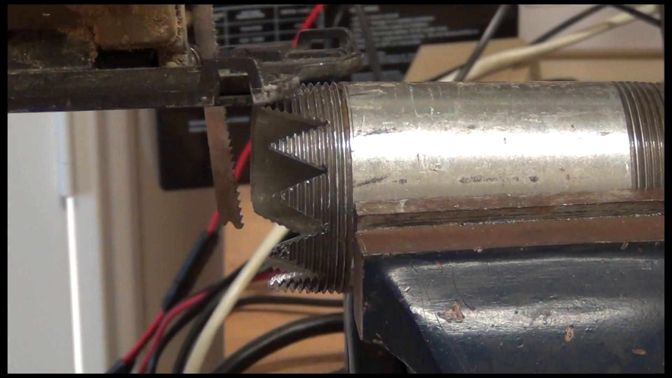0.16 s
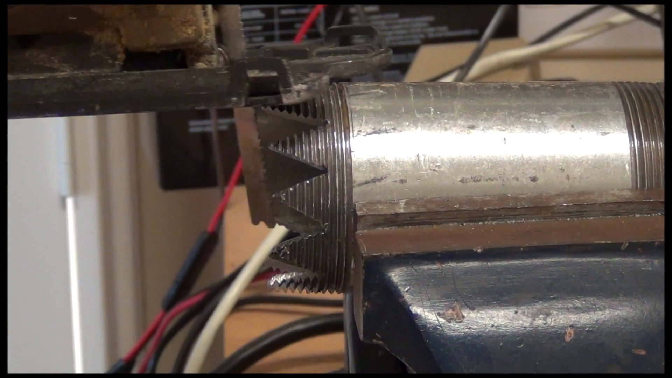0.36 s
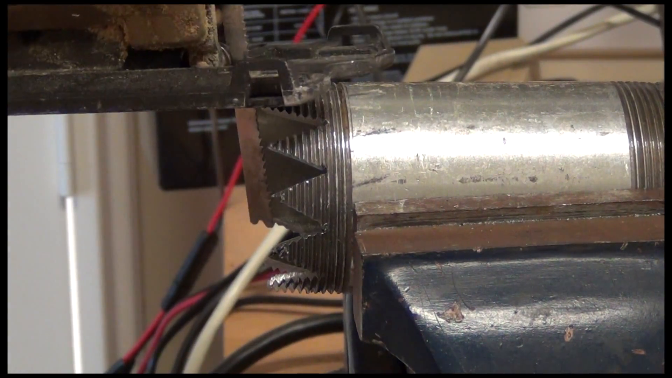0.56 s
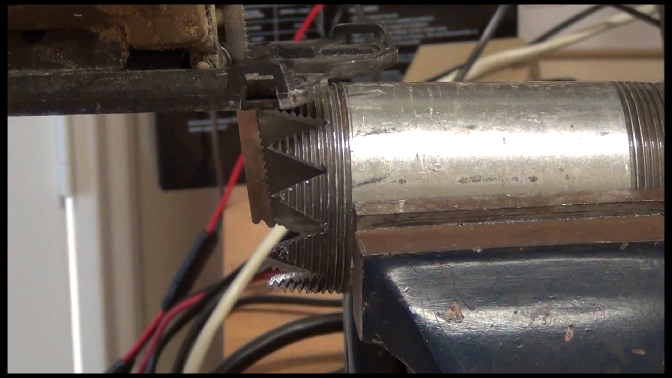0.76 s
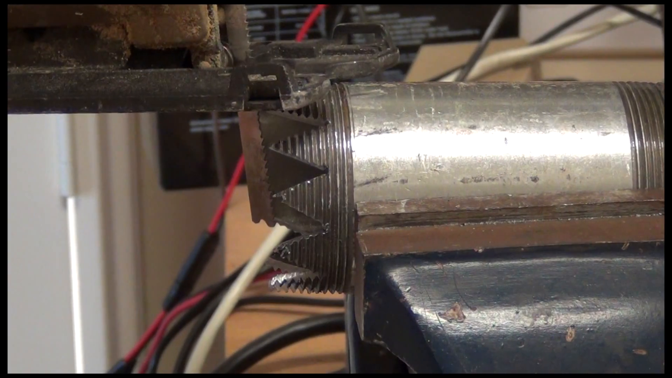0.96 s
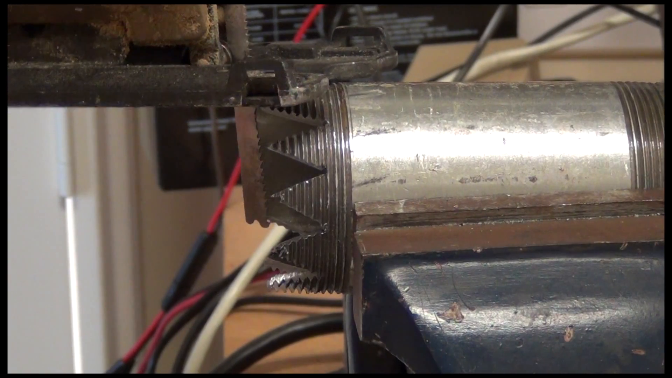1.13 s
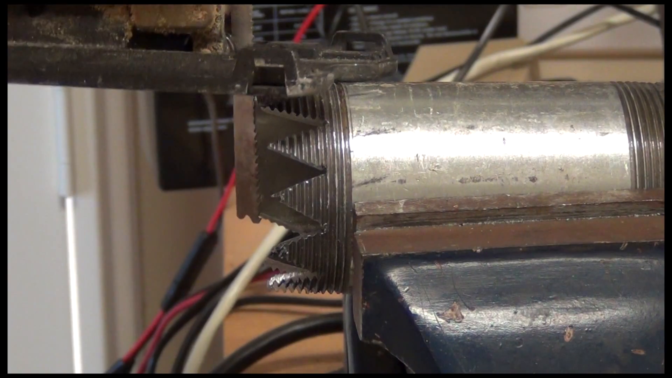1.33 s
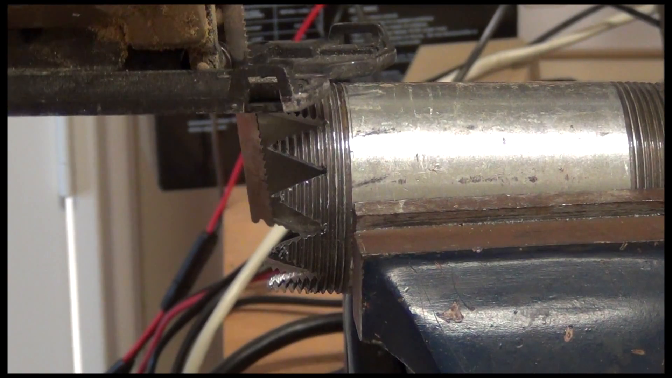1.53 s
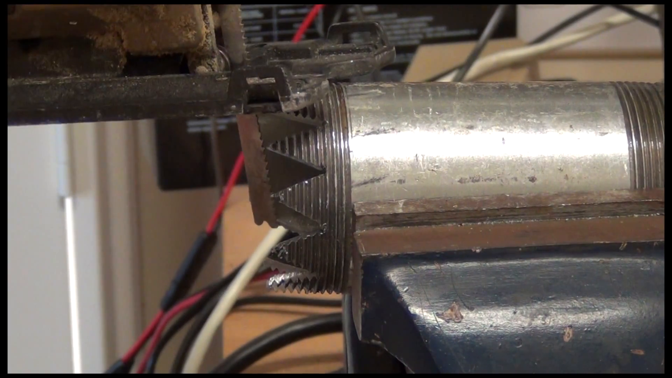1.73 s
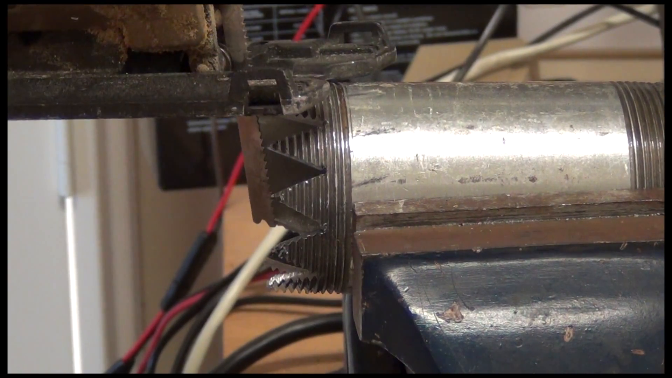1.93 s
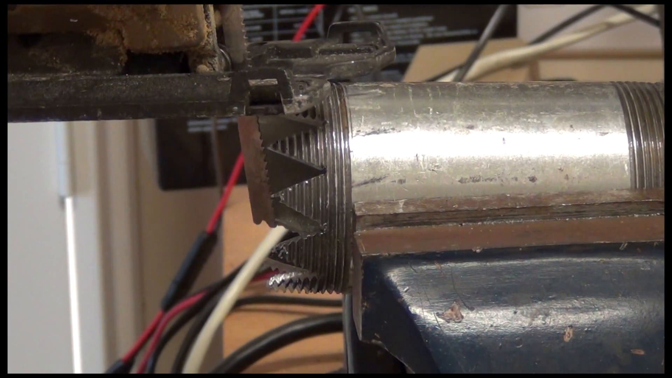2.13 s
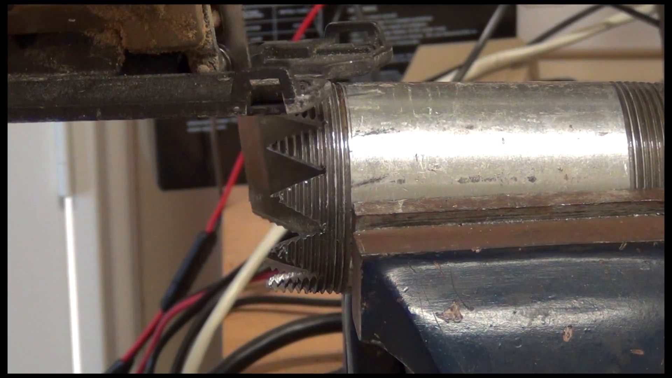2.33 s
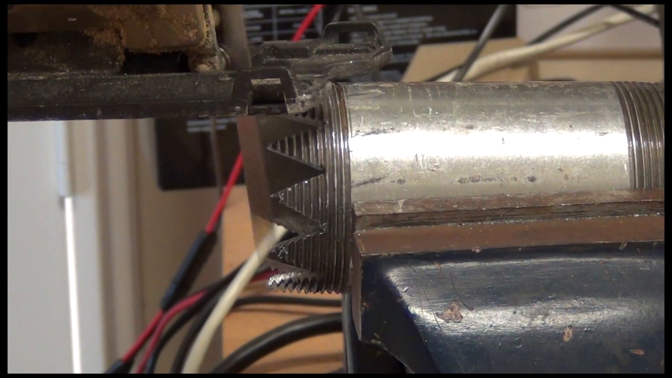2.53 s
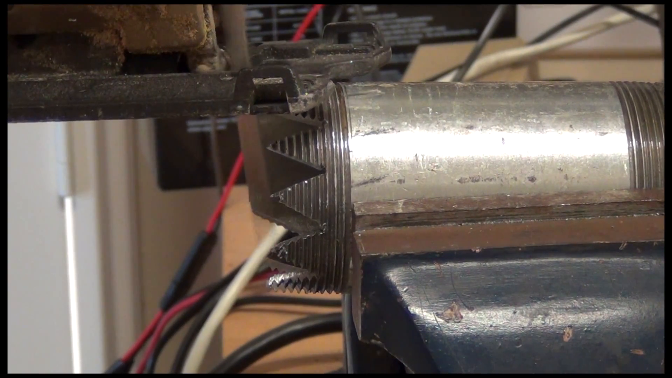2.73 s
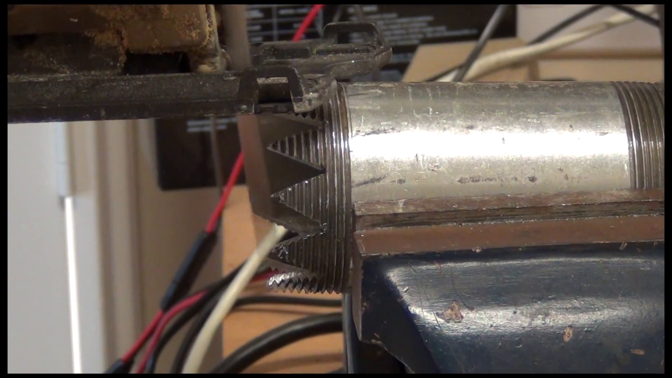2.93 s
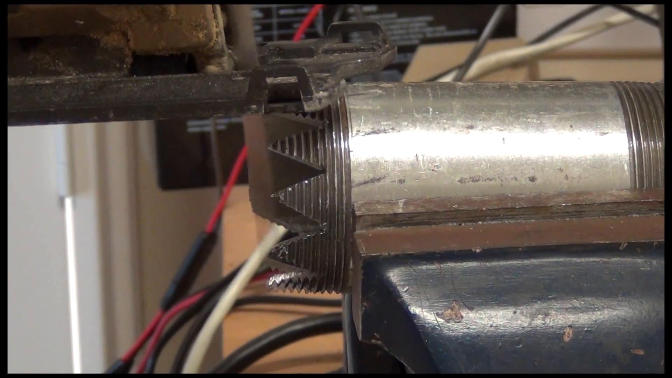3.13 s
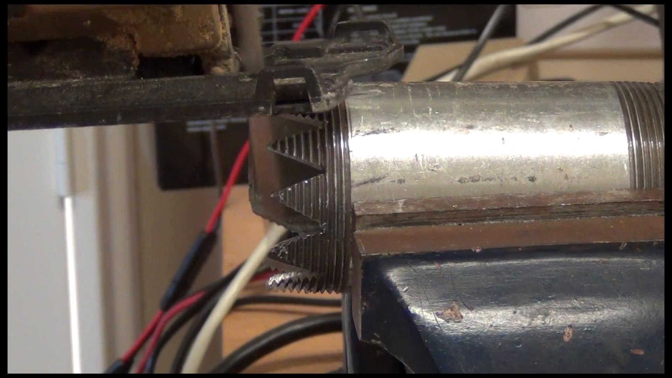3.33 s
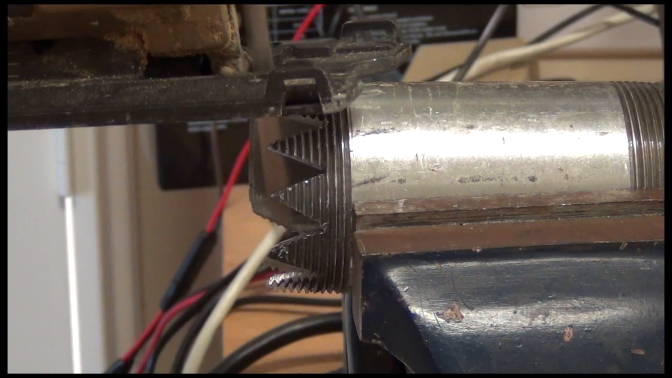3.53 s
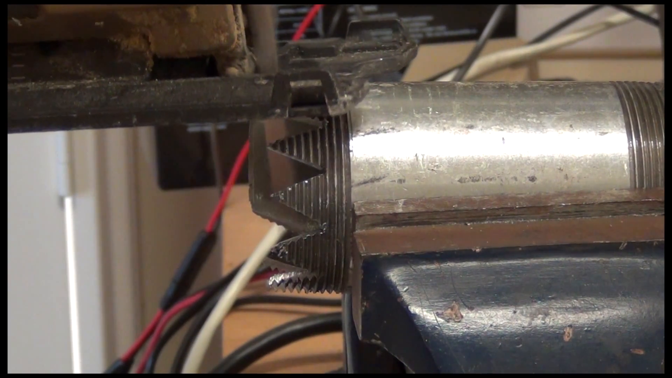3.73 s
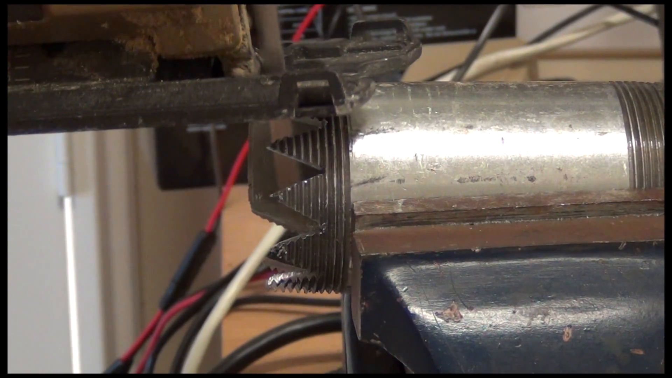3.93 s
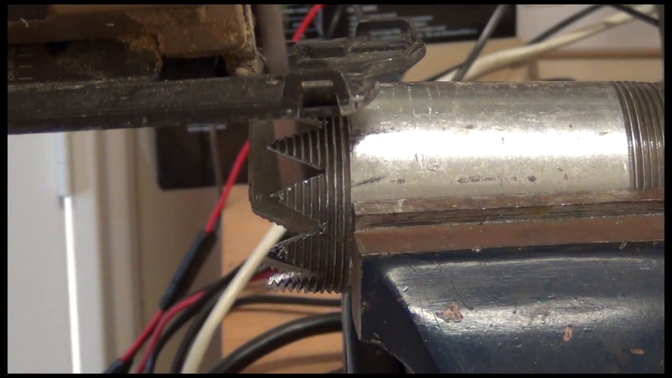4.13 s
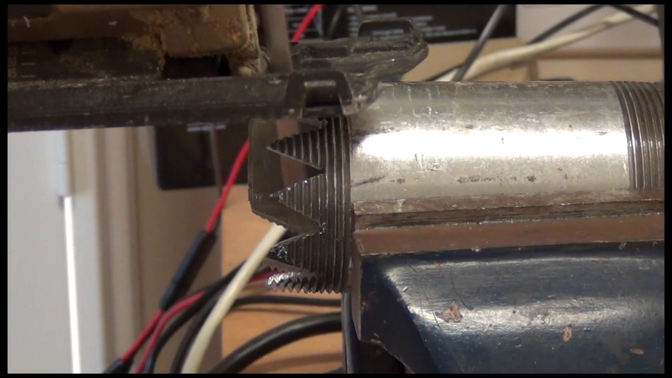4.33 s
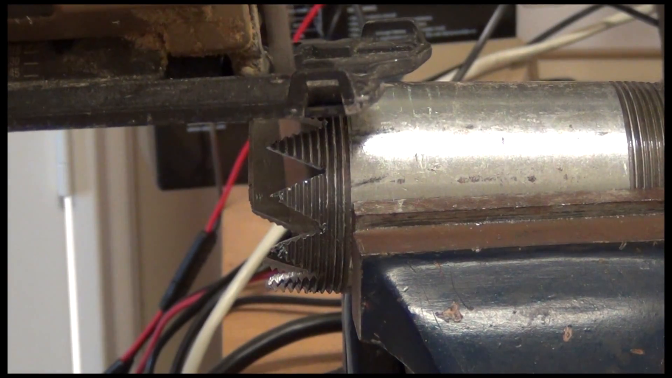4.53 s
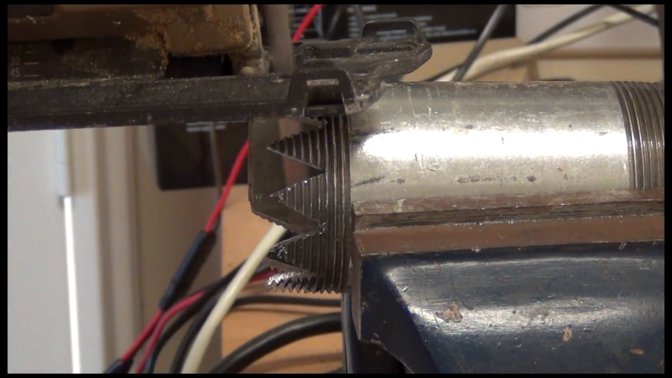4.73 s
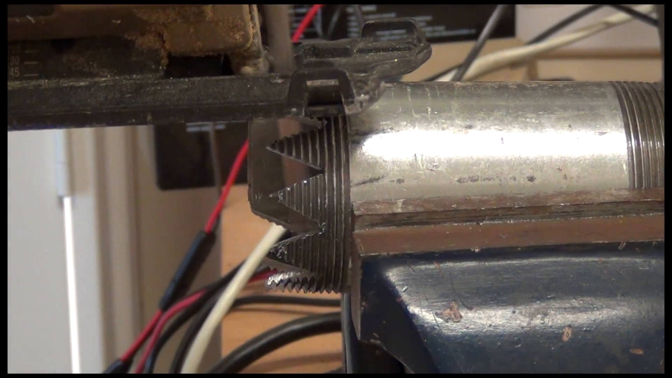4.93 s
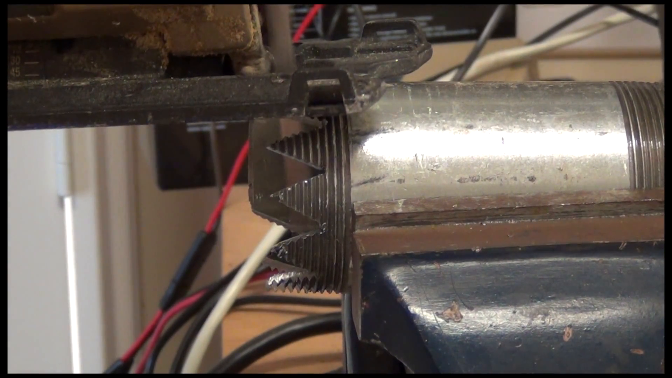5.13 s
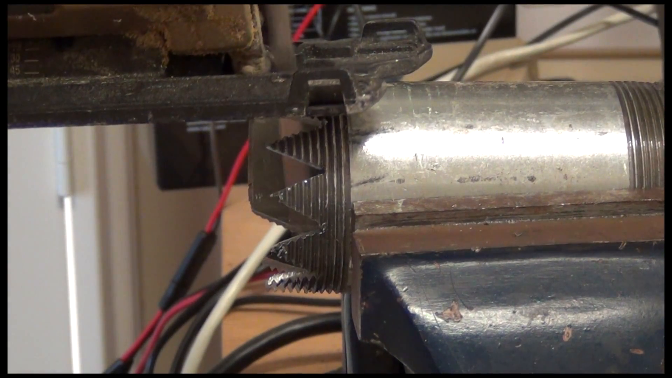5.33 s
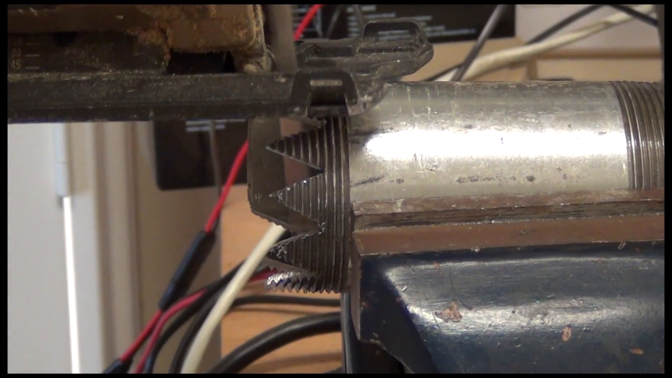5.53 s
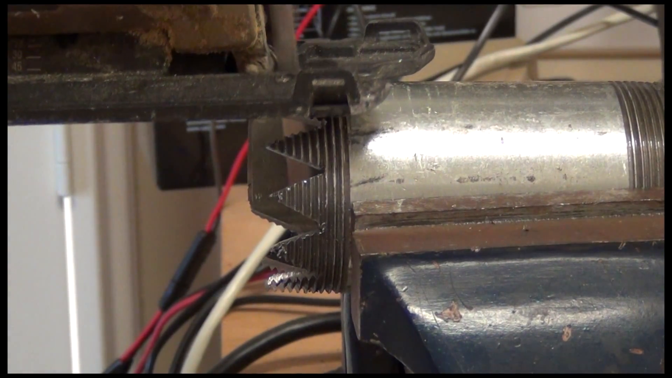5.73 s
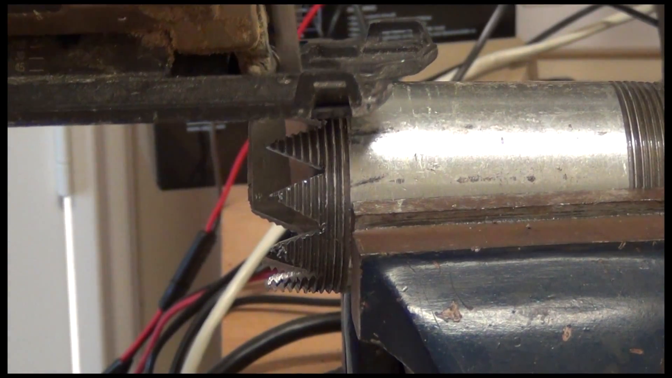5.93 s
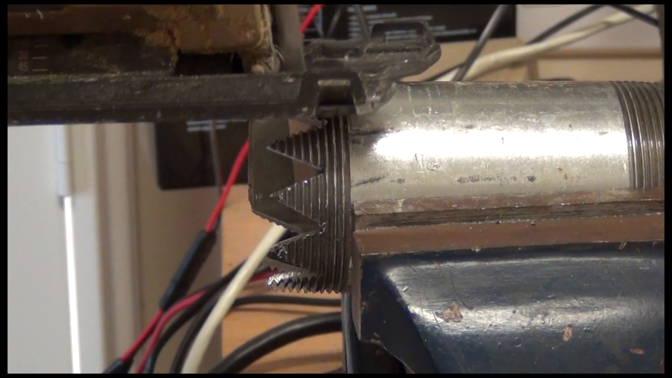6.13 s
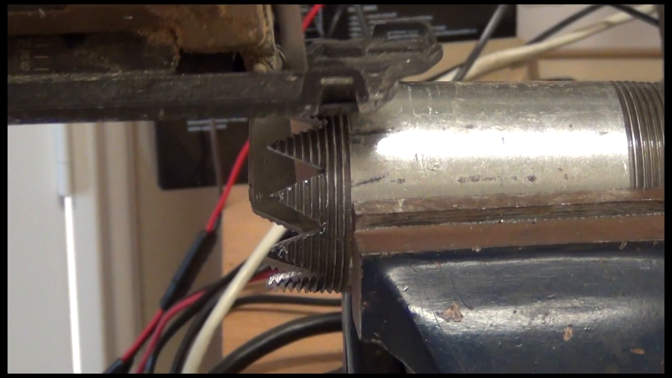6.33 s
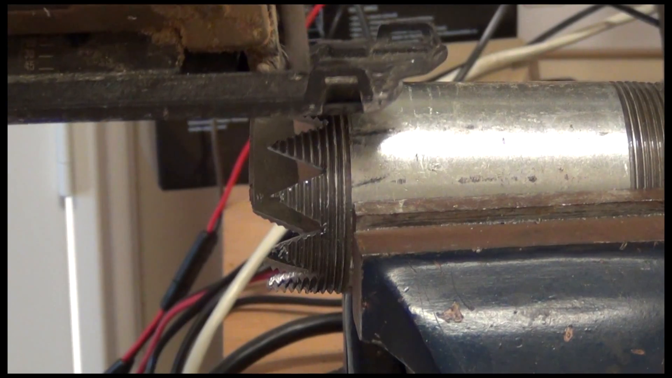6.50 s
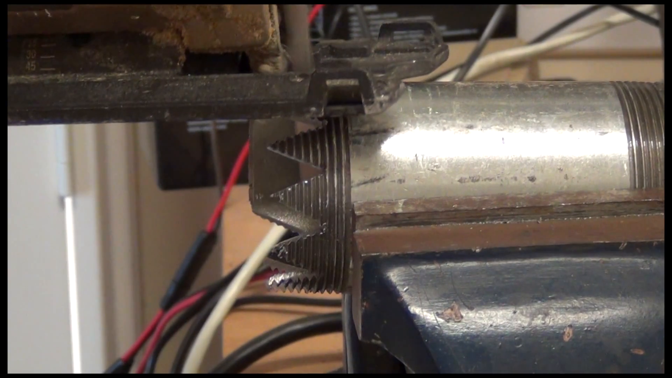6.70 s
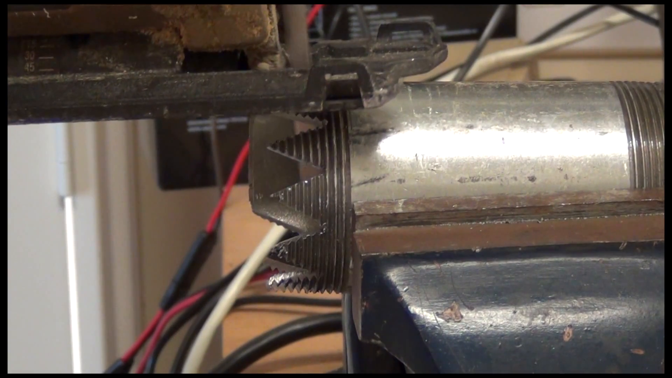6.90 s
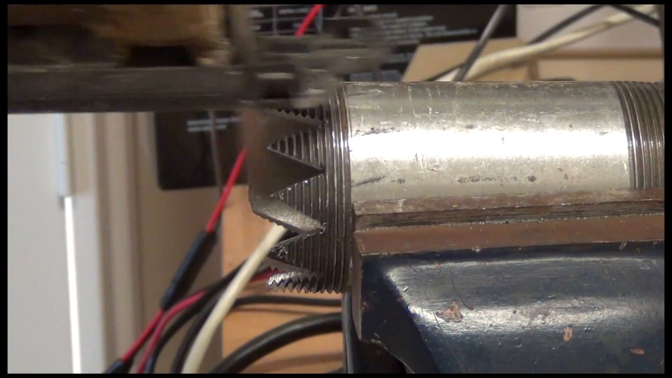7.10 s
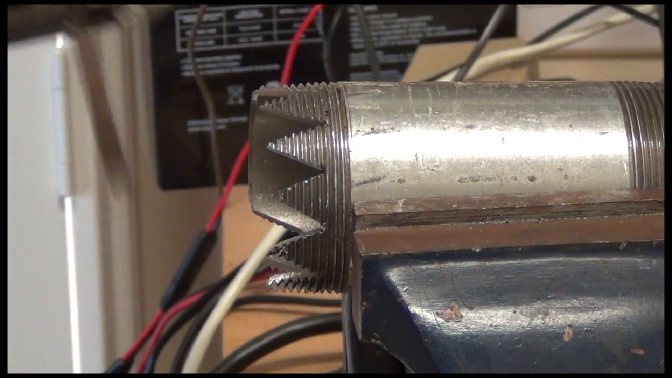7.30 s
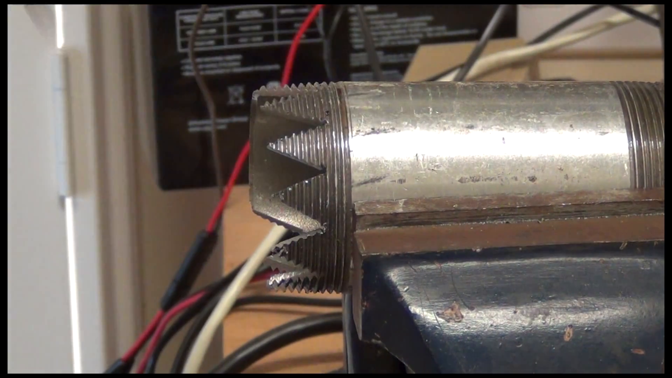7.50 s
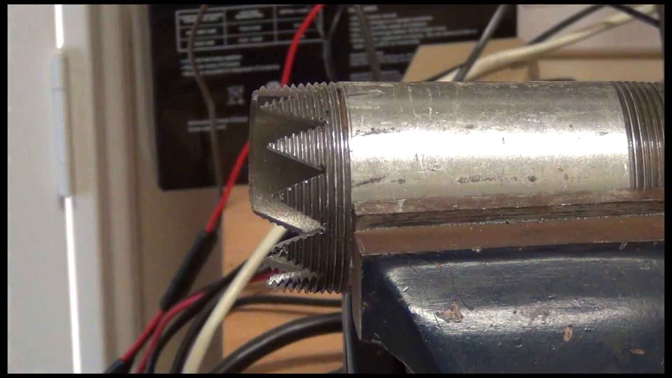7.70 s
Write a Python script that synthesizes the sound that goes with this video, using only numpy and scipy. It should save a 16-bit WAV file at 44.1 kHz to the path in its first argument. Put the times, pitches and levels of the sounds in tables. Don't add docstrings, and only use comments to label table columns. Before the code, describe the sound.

Over a steady room hum, metal ticks and light scrapes, then an electric jigsaw bites loudly into a clamped metal pipe and finally winds down.

```python
import sys
import numpy as np
from scipy import signal
from scipy.fft import rfft, irfft, next_fast_len
from scipy.io import wavfile
from scipy.ndimage import uniform_filter1d, map_coordinates

SR = 44100
rng = np.random.default_rng(int(sys.argv[2]) if len(sys.argv) > 2 else 0)


def materialize(psi):
    bounded = np.clip(np.atleast_2d(psi).T, -1, 1)
    quanta = np.round(bounded * 32767).astype(np.int16)
    wavfile.write(sys.argv[1], SR, quanta)


def how_loud(loudness_db):
    steps = np.asarray(loudness_db, float) / 20
    return 10 ** steps


N = 346613
T = np.arange(N) / SR
LEFT_RIGHT = np.array([[.5], [-.5]])


def evened(x):
    return x / np.sqrt(np.mean(x ** 2) + 1e-20)


def read(points, hz):
    f, value = np.transpose(points)
    return np.interp(np.log(hz + 1), np.log(f + 1), value)


def curve(points):
    return np.interp(T, *np.transpose(points))


def bump(t, s, length_s):
    return np.exp(-(2 * (t - s) / length_s) ** 2)


def fade(s, length_s):
    return np.clip((T - s) / length_s + .5, 0, 1)


def drift(hz, size=N, step=64):
    coarse = T[:size:step]
    chance = map_coordinates(rng.standard_normal(400), [coarse * hz % 399], order=3)
    return np.interp(T[:size], coarse, chance)


def tone(hz, phase):
    return np.sqrt(2) * np.cos(2 * np.pi * np.cumsum(hz) / SR + phase)


def coloured(x, gain):
    size = next_fast_len(N)
    return irfft(rfft(x, size) * gain(np.fft.rfftfreq(size, 1 / SR)), size)[..., :N]


def bandpass(x, order, lo_hz, hi_hz):
    sos = signal.butter(N=order, Wn=[lo_hz, hi_hz], btype="band", fs=SR, output="sos")
    return signal.sosfilt(sos, x)


def band(x, lo_hz, hi_hz):
    return evened(bandpass(x, 3, lo_hz, hi_hz))


def resonate(x, hz, width_hz):
    r = np.exp(-np.pi * width_hz / SR)
    if np.ndim(hz) == 0:
        c = r * np.cos(2 * np.pi * hz / SR)
        return evened(signal.lfilter([1, -c], [1, -2 * c, r ** 2], x))
    turn = np.exp(2j * np.pi * np.cumsum(hz) / SR)
    return evened((turn * signal.lfilter([1 - r], [1, -r], x * turn.conj())).real)


# frequency in Hz, level in dB per Hz.
HUM = [(18, -58), (30, -13), (58, -17), (109, -13), (229, -7), (276, -2), (332, 1), (533, -1.5), (953, -3),
       (1890, -7), (6720, -30), (15200, -34.5), (16500, -48)]
# frequency in Hz, level in dB.
HUM_LINES = [(118.4, -59.5), (177.6, -65), (226.1, -54.5), (355.3, -52.5), (479.1, -54.5), (532.9, -50),
             (990.5, -80)]


def workshop():
    air = rng.standard_normal((3, N))
    hum = evened(coloured(air[0] + 0.45 * air[1:], lambda hz: how_loud(read(HUM, hz))))
    hum *= how_loud(-39.5 + .5 * drift(12))
    hum += sum(how_loud(db) * resonate(air[0], hz, 6.0) for hz, db in HUM_LINES)
    gain_db = np.interp(T, [2.25, 2.7], [0, -27])
    return hum * how_loud(gain_db - .7 * LEFT_RIGHT)


# time in seconds, peak in dB, frequency in Hz, low knock in relative dB, pipe ring in relative dB.
TICKS = [(0.0607, -22.5, 4700, 0, -42), (0.0605, -29, 10500, -30, -45), (0.068, -34, 11300, -30, -45),
         (0.1815, -6, 9550, -13, -25.5), (0.1855, -9.5, 10200, -20, -40), (0.183, -12, 3000, -30, -45),
         (0.249, -25, 4520, -12, -21), (0.4738, -33, 4700, -15, -30), (1.1975, -37, 12000, -20, -40),
         (1.1975, -17, 2800, -30, -45), (1.219, -31, 7380, -15, -32), (1.2195, -38, 5900, -30, -45),
         (1.29, -12, 12800, -12, -37), (1.2905, -27, 9000, -30, -45), (1.291, -26, 7100, -30, -45),
         (1.4142, -28, 10300, -15, -30), (1.4686, -27, 8900, -15, -36), (1.5389, -36, 7040, -15, -36),
         (1.598, -13, 11000, -8, -40), (1.5982, -21, 5300, -30, -45), (1.606, -29, 8500, -30, -40),
         (1.617, -31, 10000, -30, -40), (1.676, -25, 10000, -15, -38), (1.692, -32, 9500, -15, -40),
         (2.0931, -35, 11500, -20, -40), (2.1908, -24, 4700, -20, -40), (2.2435, -19, 9000, -6, -35),
         (2.247, -19, 10000, -6, -32), (2.2475, -17, 3000, -10, -40), (2.2652, -5, 11400, 6, -26),
         (2.274, -8, 11900, 5, -33), (2.278, -7, 4000, 3, -24), (2.2836, -5, 10000, 4, -26),
         (2.2918, -5, 10500, -4, -30), (2.2995, -4, 10440, -6, -34), (2.33, -10, 11000, -3, -30),
         (2.3395, -5, 11500, 5, -30), (2.5436, -5, 11000, -3, -35)]
# frequency in Hz, level in dB, t60 in seconds.
TICK_MODES = [(2960, 5, 0.035), (1203, -9, 0.04), (1920, -9, 0.05), (5060, -13, 0.03), (6730, -14, 0.27),
              (7400, -12, 0.14), (7750, -17, 0.43), (8500, -17, 0.17), (8970, -11, 0.22),
              (11520, -8, 0.033)]


def tick(t, hz, low_db, ring_db):
    crack = rng.standard_normal(len(t)) * (how_loud(-60 * t / 0.022) + how_loud(-60 * t / 0.003))
    bright = bandpass(crack, 2, 0.73 * hz, min(1.11 * hz, 14000))
    knock = uniform_filter1d(crack, size=3) - uniform_filter1d(crack, size=120)
    ring = np.zeros(len(t))
    if ring_db > -37:
        for mode_hz, mode_db, t60_s in TICK_MODES:
            level = how_loud(mode_db + ring_db + rng.uniform(4, 9) - 60 * t / t60_s)
            phase = 2 * np.pi * mode_hz * rng.uniform(0.98, 1.03) * t
            ring += level * np.sin(phase + 2.2 * drift(160, size=len(t)))
    rattle = uniform_filter1d(rng.standard_normal(len(t)), size=3)
    ring += 0.17 * how_loud(-8.5 - 60 * t / 0.25) * rattle
    if abs(hz - 7200) < 300:
        ring += how_loud(-18 - 60 * t / .08) * np.sin(2 * np.pi * hz * t)
    return 0.42 * bright + 0.33 * how_loud(low_db) * knock + ring


# time in seconds, peak in dB, frequency in Hz, t60 in seconds.
THUMPS = [
    (0.197, -41, 101, 0.4),
    (1.211, -33, 107, 0.16),
    (2.294, -33, 121, 0.39),
    (2.399, -29, 106, 0.064),
    (6.631, -35, 129, 0.087),
]
# middle in seconds, length in seconds, level in dB.
SCRAPE = [
    (0.001, 0.085, -43.5),
    (0.161, 0.0098, -55),
    (0.26, 0.18, -51),
    (.41, .1, -55),
    (0.74, .07, -51),
    (1.642, .12, -56),
    (2.226, 0.18, -51.5),
]


def handling():
    out, t = np.zeros(N + SR), T[:SR // 3]
    for s, db, hz, low_db, ring_db in TICKS:
        out[round(s * SR):][:len(t)] += how_loud(db) * tick(t, hz, low_db, ring_db)
    for s, db, hz, t60_s in THUMPS:
        out[round(s * SR):][:len(t)] += how_loud(db - 60 * t / t60_s) * np.sin(2 * np.pi * hz * t)
    slide = sum(how_loud(db) * bump(T, s, length_s) for s, length_s, db in SCRAPE)
    return out[:N] + slide * band(rng.standard_normal(N), 3800, 13000)


def walls(x):
    t = T[:SR // 2]
    taps = rng.choice([-1., 1.], (2, len(t))) * (rng.random((2, len(t))) < .05)
    taps *= how_loud(-60 * t / 0.26) * (t > .004)
    wet = signal.fftconvolve(x[None], taps / np.linalg.norm(taps[0]), axes=1)[:, :N]
    return coloured(wet, lambda hz: hz / np.hypot(hz, 250.0))


# time in seconds, strokes per second.
SPEED = [(2.25, 24), (2.78, 26.5), (2.87, 31.8), (2.93, 35.9), (3.02, 40), (3.1, 41.91), (3.3, 43.4),
         (3.57, 42.5), (4.0, 42.0), (4.25, 42.6), (4.59, 43.3), (5.1, 46.1), (5.44, 47.0), (5.78, 46.29),
         (6.12, 45.2), (6.29, 45.55), (6.63, 45.01), (6.83, 45.89)]


def speed():
    off_s = np.maximum(T - SPEED[-1][0], 0)
    return curve(SPEED) - 23 * off_s - 3.6 * (1 - np.exp(-off_s / .185))


# time in seconds, share 0-1.
LOADED = [(2.3, .4), (3.0, 1), (6.9, 1), (7.2, .15)]


def teeth(turns):
    hits = how_loud(2.0 * rng.exponential(1, N)) * rng.standard_normal(N)
    catch = 1 + curve(LOADED) * (.15 * np.cos(2 * np.pi * turns) + .11 * np.cos(6 * np.pi * turns))
    uneven_db = 0.7 * drift(30.0) + (.9 - .5 * fade(3, .4)) * drift(110)
    return evened(hits * catch * how_loud(uneven_db))


# frequency in Hz, width in Hz, level in dB.
PIPE = [(575, 82, 5.5), (847, 77, -1.5), (1108, 65, 1.5), (1223, 99, 7.5), (1644, 81, 7.5), (1820, 35, 3),
        (2320, 46, -12), (2626, 26, 3), (2680, 30, -16.5), (2840, 170, 4), (4750, 90, -26.5),
        (7380, 54, 4.5)]


def pipe_wall(drive):
    rub = rng.standard_normal(N) * abs(drive)
    modes = sum(how_loud(db + 3 * drift(3)) * resonate(rub, hz, width_hz) for hz, width_hz, db in PIPE)
    return drive + how_loud(-27) * modes


# frequency in Hz, level in dB per Hz.
TEETH = [(1940, 7), (3300, 4.5), (3880, -5.5), (4650, -1.5), (6300, -2), (7350, 0.5), (8640, 0),
         (9310, -0.5), (11700, 3), (13200, -2), (15700, -16.5), (16200, -43), (16500, -61)]
# frequency in Hz, level in dB per Hz.
COAST = [(1940, -14), (3300, 2), (3960, -15), (5810, -0.5), (6340, -5), (8700, 0.5), (11200, -0.5),
         (12900, -3.5), (14900, -19), (16100, -31), (16500, -59)]


def tooth_noise(ringing, drive, rate):
    def rasp(spectrum):
        def gain(hz):
            dip = 1 - .5 / (1 + ((hz - 6450) / 75) ** 2)
            return how_loud(read(spectrum, hz)) * dip
        return band(coloured(ringing, gain), 3500, 17700)
    free = np.interp(T, [7.0, 7.5], [0, 1])
    fan = resonate(drive, 252 * rate, 420.0)
    return (1 - free) * rasp(TEETH) + free * rasp(COAST) + how_loud(-22.5) * fan


# frequency in Hz, level in dB.
MESH = [(2050, -34), (2450, -28.5), (2850, -28), (3050, -33), (3300, -32), (3500, -39), (3850, -43),
        (4100, -34), (4500, -35), (5130, -30.5), (5175, -37)]
SECOND = [(4200, -48), (4900, -44), (5200, -33), (5600, -29), (5950, -30), (6200, -37), (6500, -48),
          (7600, -41), (9500, -48), (10400, -50)]
ARMATURE = [(7000, -50), (9500, -46), (10500, -45), (11000, -32), (12300, -35), (13600, -35), (14300, -36),
            (14700, -49), (15700, -47), (16600, -56)]


def motor(rate):
    mesh_hz, armature_hz = 111 * rate, 362 * rate
    through = fade(4.5, .2)
    mesh = tone(mesh_hz, .5 * drift(35.0))
    mesh *= how_loud(np.interp(T, [6.8, 7.1], [1.3, 1.7]) * drift(20.0))
    out = how_loud(read(MESH, mesh_hz) - 7 * (1 - fade(4.5, 0.27))) * mesh
    second = tone(2 * mesh_hz, drift(40)) * how_loud(1.8 * drift(25.0))
    out += how_loud(read(SECOND, 2 * mesh_hz)) * through * second
    waver_rad = 1.2 + 1.8 * (fade(3.3, .2) - fade(5, .2))
    whine = tone(armature_hz, waver_rad * drift(60))
    masked_db = -1.5 * (1 - through) - 14 * bump(T, 3.3, .3)
    whine_db = read(ARMATURE, armature_hz) + 7 + masked_db + 1.8 * drift(25.0)
    return out + how_loud(whine_db) * fade(2.8, .1) * whine


REPEAT = .45


def grooved(drive, turns, share):
    shapes = rng.standard_normal((2, 1001))
    shapes -= uniform_filter1d(shapes, size=36, mode="wrap")
    old, new = (np.interp(turns % 1, np.arange(1001) / 1000, shape) for shape in shapes)
    wear = 2 * np.pi * .4 * T + drift(5)
    groove = 1.5 * (np.cos(wear) * old + np.sin(wear) * new)
    stroke_db = 1.6 * np.sqrt(share / REPEAT) * np.cos(2 * np.pi * turns)
    blows = how_loud(stroke_db + 1.3 * drift(90))
    return blows * (np.sqrt(1 - share) * drive + np.sqrt(share) * groove)


# frequency in Hz, level in dB per Hz.
BODY = [(35, -56), (60, -56), (86, -12.5), (206, -20), (318, -8.5), (352, -9), (811, 3.5), (1030, -5),
        (1270, -1.5), (2930, 1), (3800, -4), (4940, 8), (8360, -120)]
# low edge in Hz, high edge in Hz, share of stroke rhythm,
# dB per dB of push, level in dB entering, in dB deep, in dB out of the cut.
PARTS = [
    (847, 3530, 0.42, 0.08, -2.5, -2.5, -5),
    (281, 918, 0.73, 0.66, -12, -11, -17),
    (76.5, 214, 1.68, 1.25, -33.5, -26, -52),
]


def bench(ringing, turns, regular, push_db, snag_db):
    body = coloured(grooved(ringing, turns, REPEAT * regular), lambda hz: how_loud(read(BODY, hz)))
    shake, out = shaking(turns), np.zeros(N)
    seated_s = SEATED[-1][0] - SEATED[0][0]
    for lo_hz, hi_hz, share, follow, entering_db, deep_db, out_db in PARTS:
        db = entering_db + (deep_db - entering_db) * fade(5.26, 0.72) + (out_db - deep_db) * fade(6.67, 0.21)
        part = np.clip(share * regular, 0, 1)
        rhythm = band(shake, lo_hz, hi_hz) * np.sqrt(seated_s * SR / N)
        mixed = np.sqrt(part) * rhythm + np.sqrt(1 - part) * band(body, lo_hz, hi_hz)
        out += how_loud(db + follow * push_db + snag_db) * mixed
    return out


# middle in seconds, length in seconds, frequency in Hz, width in Hz, level in dB.
CHATTER = [(2.39, 0.096, 1260, 550, -18.5), (2.383, 0.23, 5200, 980, -31), (2.705, 0.46, 2070, 340, -23.5),
           (2.814, 0.36, 1070, 149, -27), (2.72, 0.306, 810, 140, -27), (2.5, .2, 2200, 400, -25.5),
           (3.1, 0.58, 4360, 250, -30), (3.347, 1.8, 1850, 210, -28.5), (3.6, 2.4, 2892, 150, -25.5),
           (3.65, 0.19, 1230, 82, -27), (4.173, 0.11, 1220, 110, -23), (4.306, 0.44, 2320, 206, -29.5),
           (4.797, 0.33, 620, 43, -32), (2.4, 0.36, 2840, 250, -26.5), (5.57, 2.3, 3025, 190, -30),
           (6.197, 0.54, 782, 34, -33), (6.737, 0.17, 2830, 190, -29), (7.22, 0.36, 3420, 350, -28.5),
           (7.508, 0.68, 890, 226, -31), (7.55, 0.4, 8950, 500, -32), (2.375, 0.11, 1940, 810, -22),
           (4.42, .45, 11300, 800, -23), (2.566, 0.17, 1150, 350, -25), (6.614, 0.13, 835, 89, -30),
           (6.85, 0.264, 950, 80, -30.5), (7.0, .3, 1580, 110, -32), (7.48, .12, 9250, 200, -29),
           (7.61, .2, 8700, 250, -29), (7.778, 0.12, 10700, 300, -28), (5.6, 2.6, 2630, 39, -36),
           (3.1, 1, 2630, 30, -33), (4.58, 0.61, 2270, 37, -33), (5.8, .6, 1720, 40, -35),
           (6.35, .25, 1235, 44, -32.5), (3.95, 0.48, 583, 83, -32), (6.65, .4, 2860, 90, -29),
           (5.9, .25, 1105, 40, -31), (6.3, 0.48, 2320, 66, -31),
           (4, 0.16, 7950, 120, -30), (3.26, 0.11, 7900, 120, -30), (3.32, 0.13, 7450, 120, -31),
         (3.55, 0.27, 7400, 110, -28), (3.8, .1, 5500, 90, -27), (3.5, .36, 6050, 150, -33),
         (3.76, .36, 5470, 150, -30), (3.99, 0.095, 5050, 130, -26), (3.55, 0.29, 5900, 100, -27),
         (3.5, 0.63, 4750, 120, -28.5), (3.83, 0.13, 4750, 130, -27), (4.12, 0.3, 4700, 150, -29),
         (4.34, .16, 4250, 110, -29)]


def chatter(drive, turns, share):
    out, steady = np.zeros(N), grooved(drive, turns, share)
    for s, length_s, hz, width_hz, db in CHATTER:
        now = abs(T - s) < length_s
        moment = how_loud(db + 1.2 * drift(28.74, size=now.sum())) * bump(T[now], s, length_s)
        source = steady if hz < 6300 else drive
        out[now] += moment * resonate(resonate(source[now], hz, 3 * width_hz), hz, width_hz)
    return out


# middle in seconds, length in seconds, frequency in Hz, glide in Hz per second, level in dB.
SQUEAL = [(2.64, 0.27, 9530, -3, -21.5), (2.85, 0.48, 9670, 1.5, -17), (3.115, 0.32, 9580, 2, -19),
          (3.91, 0.37, 9660, 0, -24), (4.08, 0.12, 9830, 0, -19), (4.26, 0.23, 9530, -1500, -16),
          (4.53, 0.31, 9760, 0, -18.5), (4.855, 0.55, 9600, 0, -23.5), (5.298, 0.47, 9600, -2, -18),
          (5.7, 0.36, 9660, 0.5, -22), (6.117, 0.39, 9660, 0, -21), (6.45, 0.25, 9700, -2, -27),
          (7.017, .08, 9640, 0, -49), (7.12, 0.16, 9650, 0, -16)]


def squeal(drive):
    out = np.zeros(N)
    for s, length_s, hz, glide, db in SQUEAL:
        now = abs(T - s) < length_s
        t = T[now]
        pitch_hz = hz + glide * (t - s) + 40 * drift(25, size=len(t))
        level = how_loud(db - 5.5 + 1.5 * drift(19.8, size=len(t))) * bump(t, s, length_s)
        out[now] += level * resonate(drive[now], pitch_hz, 120.0)
    return out


# time in seconds, share of shaking that repeats each stroke 0-1.
SEATED = [(3.0, 0.24), (3.3, 0.76), (3.5, 1), (4.3, 0.8), (4.7, 0.53), (5.3, 0.33), (5.7, 0.51),
          (6.4, 0.61), (6.85, 0.2), (6.92, 0.1)]
# time in seconds, stage (0 entering, 1 wall through, 2 deep).
DEPTH = [(4.1, 0), (4.35, 1), (4.6, 1), (4.9, 2)]
# multiple of the stroke, level in dB.
STAGES = [
    [(1, -37), (2, -17), (3, -5), (4, -13.5), (5, -18), (6, -13), (7, -28), (8, -13), (9, -2.5), (10, -6),
     (11, -1.5), (12, 2.5), (13, 1), (14, 4), (15, -2), (16, -16), (17, -11), (18, -7), (21, -8.5),
     (25, -6.5), (29, -7.5)],
    [(1, -19), (2, -1), (3, -4), (4, -13), (5, -4), (6, -16), (7, -17), (8, -8), (9, -5), (10, -3.5),
     (11, 2), (12, -1), (13, 5), (14, -19), (15, -20), (16, 2), (17, -7), (18, -10), (21, -14), (25, -16),
     (29, -7)],
    [(1, -30), (2, -5.5), (3, -8), (4, -13), (5, -12), (6, -9.5), (7, 0.5), (8, -6.5), (9, -5), (10, -1.5),
     (11, 4), (12, -11), (13, -4.5), (14, -1), (15, -27), (16, -4), (17, -11), (18, -2.5), (20, -7),
     (23, -17), (24, -8.5), (25, -19), (27, -7.5)],
]


def shaking(turns):
    on, step = slice(round(SEATED[0][0] * SR), round(SEATED[-1][0] * SR)), 64
    t, out = T[on][::step], np.zeros(N)
    stage = np.interp(t, *np.transpose(DEPTH))
    stroke, multiple = np.exp(2j * np.pi * turns[on]), 1
    for k in range(1, 64):
        db = np.interp(stage, [0, 1, 2], [read(orders, k) for orders in STAGES])
        db += (2.3 + .04 * k) * drift(11 * step, size=len(t), step=1)
        wobble = rng.random() + (0.045 + 0.0042 * k) * drift(11.0 * step, size=len(t), step=1)
        multiple = multiple * stroke
        swing = np.interp(T[on], t, how_loud(db) * np.exp(2j * np.pi * wobble))
        out[on] += (swing * multiple).real
    return out


def backlash(drive, rate):
    return how_loud(-28.0) * np.exp(-((T - 3.1) / 0.23) ** 4) * resonate(drive, 29.5 * rate, 71.0)


def waking(drive):
    out, now = np.zeros(N), abs(T - 3.8) < 1
    hz = 4150 + (8500 - 4150) * np.exp(-(T[now] - 3.15) / .45)
    window = (fade(3.15, .1) - fade(4.45, 0.47))[now]
    out[now] = how_loud(-28) * window * resonate(resonate(drive[now], hz, 1500), hz, 700.0)
    return out


# time in seconds, loudness in dB, push into the pipe in dB.
CUT = [(2.245, -26, 32), (2.285, -19.5, 0), (2.39, -20.5, 16.5), (2.5, -17, 9), (2.62, -19.5, 5.5),
       (2.99, -18, -8.5), (3.15, -17.5, -2.5), (3.6, -17.5, 3.5), (4.2, -18.5, 5.5), (4.44, -17.5, 1.5),
       (4.72, -17, -3), (5.52, -16.5, -4), (5.63, -17, -0.5), (6.5, -16, -1.5), (6.75, -15.5, 6.5),
       (7.08, -17, 8), (7.15, -17.5, 1.5), (7.86, -21, -2.5)]


def saw():
    rate = speed()
    turns = np.cumsum(rate) / SR
    s, *hand = np.transpose(CUT)
    teeth_db, push_db = (np.interp(T, s, v) for v in hand)
    gate = np.clip(np.minimum(T - s[0], s[-1] + 0.02 - T) / 0.029, 0, 1)
    regular = np.clip(curve(SEATED) * (0.98 + 0.44 * drift(6.0)), 0, .95)
    snag_db = 1 - fade(3, 0.13)
    drive = teeth(turns)
    ringing = pipe_wall(drive)
    cut = tooth_noise(ringing, drive, rate) + bench(ringing, turns, regular, push_db, snag_db)
    wobble_db = (0.4 + 0.16 * snag_db) * drift(14.0)
    rub = teeth(turns)
    blade = chatter(rub, turns, REPEAT * regular) + squeal(rub) + backlash(rub, rate) + waking(rub)
    turning = 1 - .35 * (1 - fade(SEATED[0][0], 0.42)) * np.cos(np.pi * turns + .5) ** 20
    return gate * (turning * (how_loud(teeth_db + wobble_db) * cut + blade) + motor(rate))


def scene():
    near = saw() + handling()
    pan_db = np.interp(T, [2.0, 2.3, 6.9, 7.5], [-.8, 0.78, 0.5, 1.75])
    return how_loud(-0.81 + pan_db * LEFT_RIGHT) * near + how_loud(-11.0) * walls(near) + workshop()


def top_cut(x):
    return signal.sosfilt(signal.butter(12, 16410, fs=SR, output="sos"), x)


# frequency in Hz, left over right in dB.
PORT_DB = [(60, 2.8), (240, 1.2), (950, 0.77), (3770, 0.057), (15000, 0.19)]
# frequency in Hz, left ahead of right in radians.
PORT_RAD = [(0, 0), (430, 0.0083), (2670, -0.0), (8790, 0.16), (16400, 0.0)]


def record(dry):
    def port(hz):
        return how_loud(LEFT_RIGHT * read(PORT_DB, hz)) * np.exp(1j * LEFT_RIGHT * read(PORT_RAD, hz))

    def edges(hz):
        treble = np.clip((15800 - hz) / 60, .003, 1) * (hz < 16400)
        return treble / np.hypot(1, (52.0 / (hz + 1)) ** 2)

    limited = .82 * np.tanh(1.06 * coloured(dry, port) / .82)
    return top_cut(coloured(limited, edges))


dry = scene()
out = record(dry)
materialize(out)
```